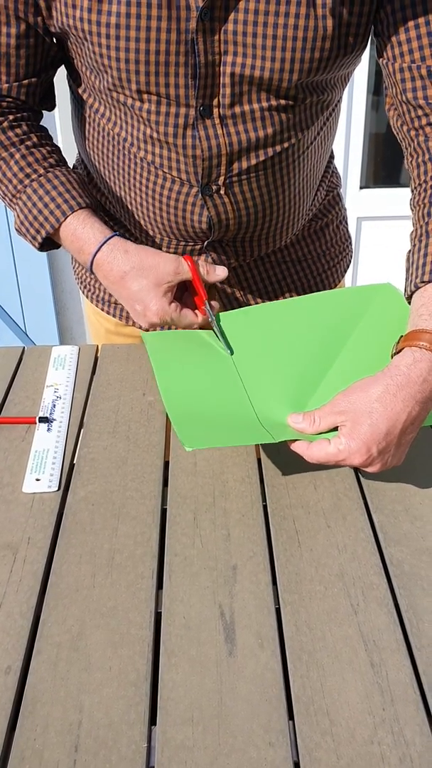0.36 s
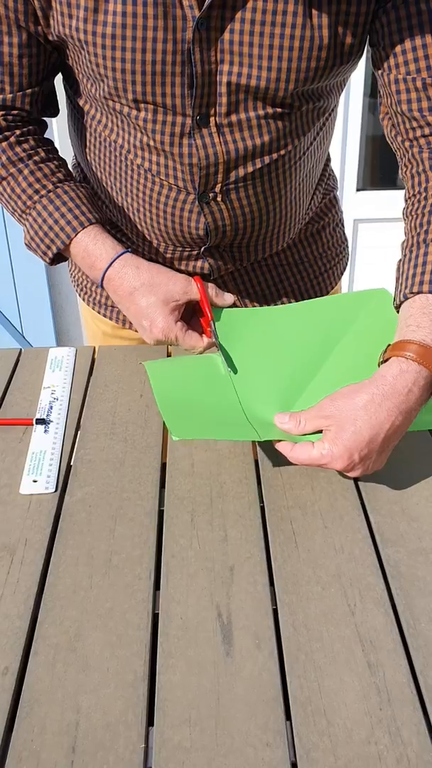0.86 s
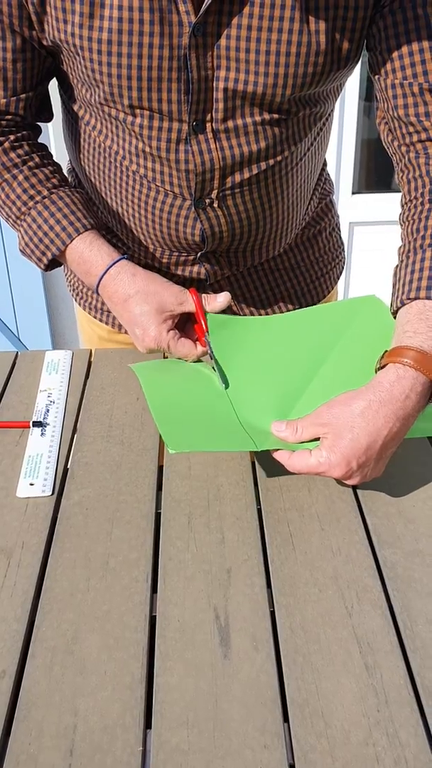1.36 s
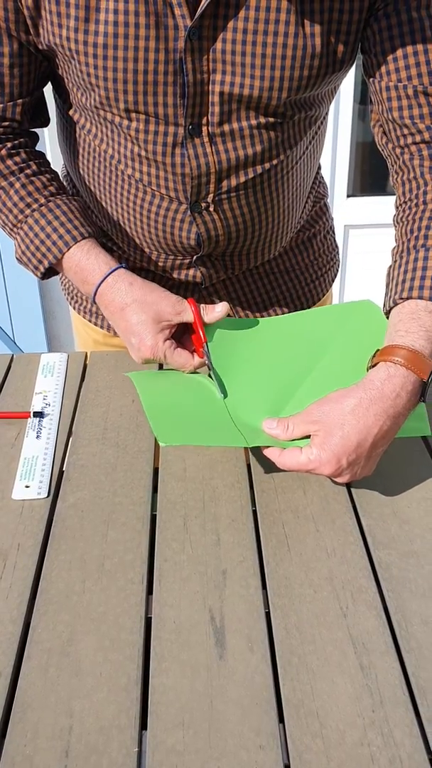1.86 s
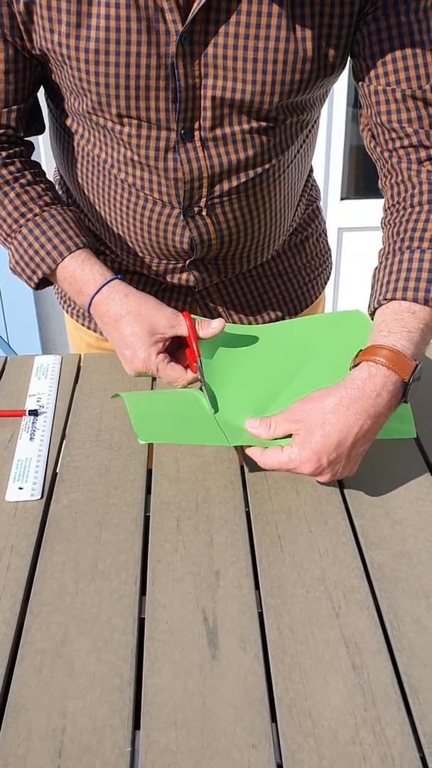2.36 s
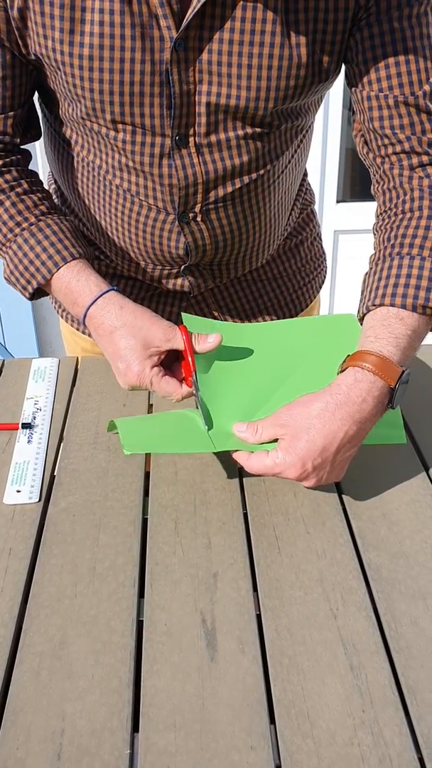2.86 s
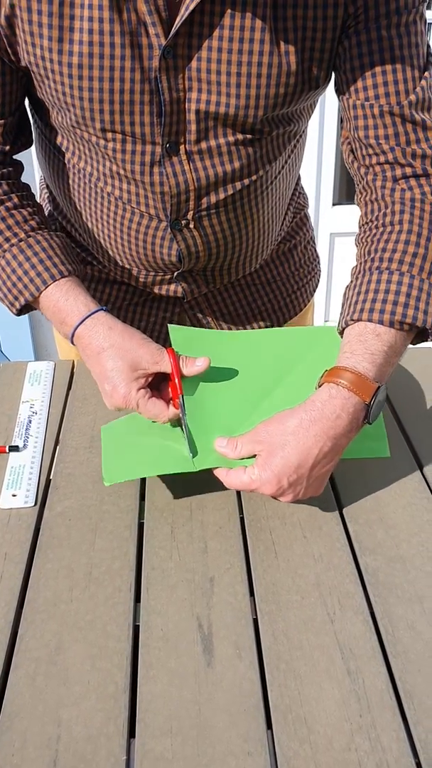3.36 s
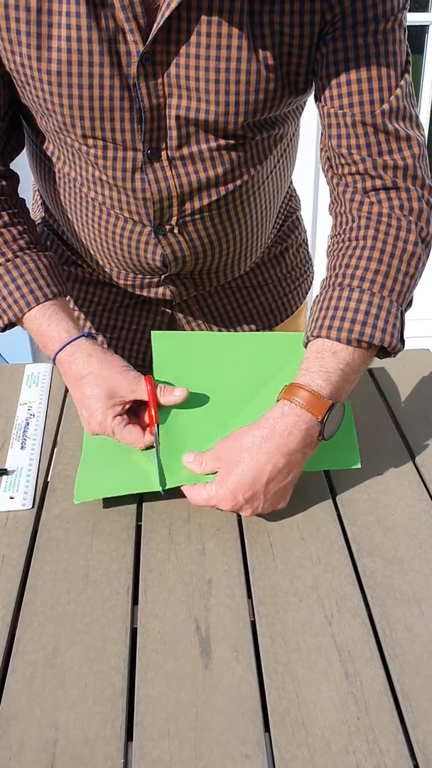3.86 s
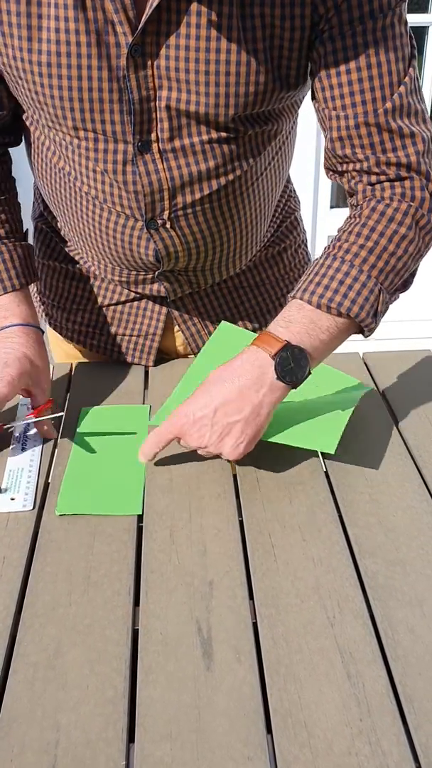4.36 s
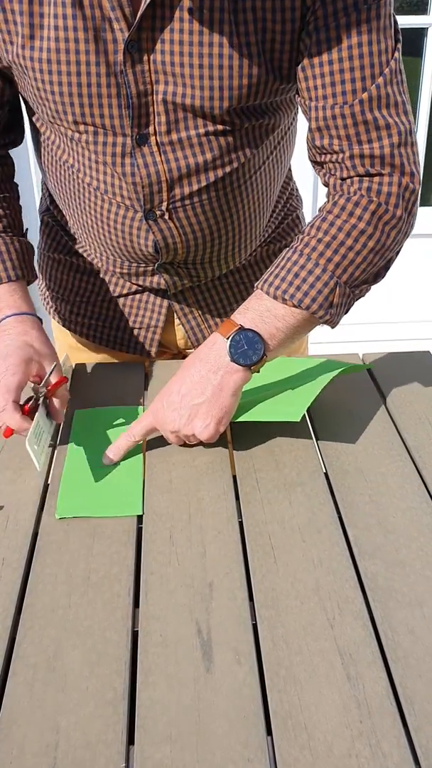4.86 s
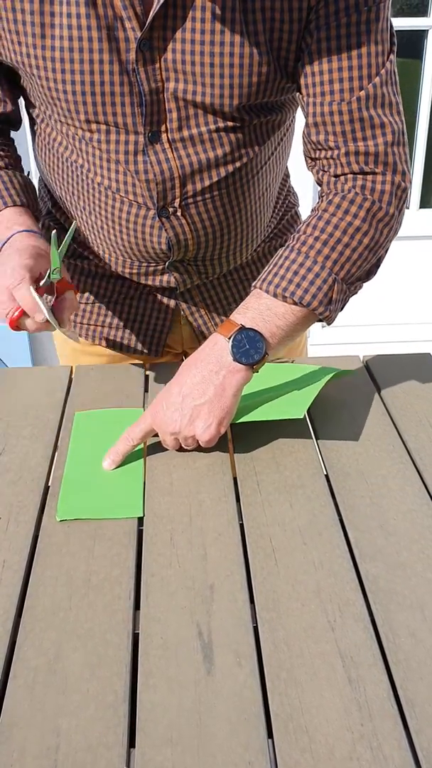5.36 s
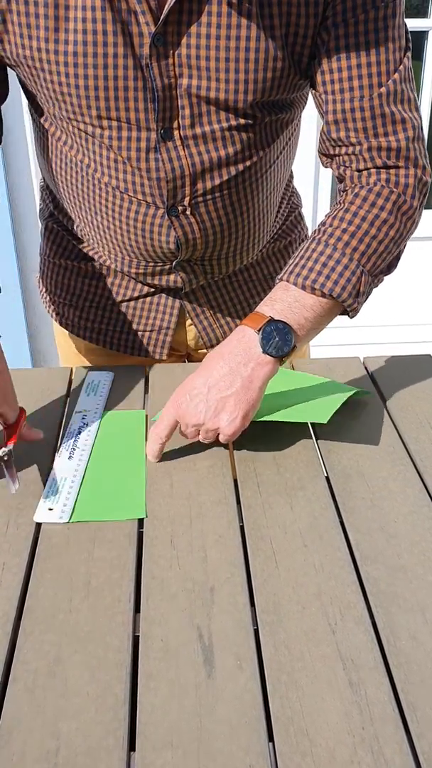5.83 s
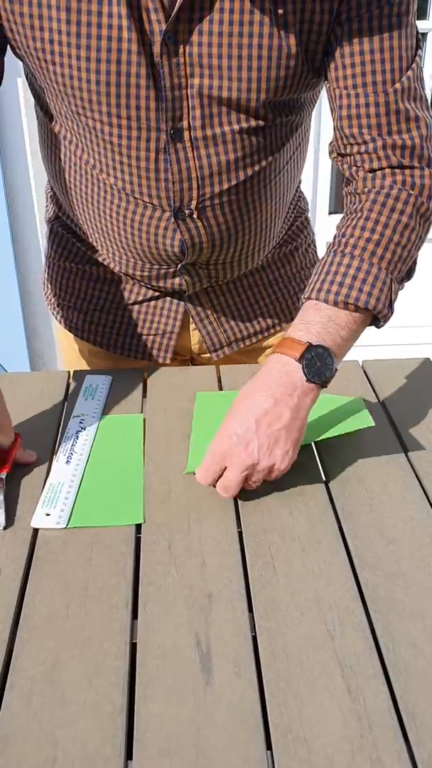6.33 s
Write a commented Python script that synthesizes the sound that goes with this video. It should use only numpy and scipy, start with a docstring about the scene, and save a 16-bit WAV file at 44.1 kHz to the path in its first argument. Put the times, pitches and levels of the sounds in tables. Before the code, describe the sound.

Close stereo sound of paper being snipped, with short crackling rips, papery rasping and a firm blade clap near the end of the cut. Then come hard clacks and slides of a ruler on wooden boards, a pause, a bright slap, light ticks and a rustling drag of the sheet. Dry outdoor space, quiet air hiss, irregular wind puffs thudding in the microphones.

```python
"""Scissors work through a sheet of paper over a wooden table outdoors, closing in jerks and sliding open again:
random fibre crackle is filtered into sheet, treble, body and edge layers, with short noise rips on top. Blades
clap, the ruler ticks in small bounces, pieces slide, a ruler is tipped up and slapped back, and the sheet is
dragged off: the blows are decaying noise, with ringing wood under the ruler; the slides are crackle filtered
for wood. Gusts thump in the two microphone ports as lumpy low noise, over a faint, drifting hiss of open air."""
import sys
import numpy as np
from scipy import signal
from scipy.fft import rfft, irfft, next_fast_len
from scipy.io import wavfile
from scipy.ndimage import uniform_filter1d

SR = 44100
rng = np.random.default_rng(int(sys.argv[2]) if len(sys.argv) > 2 else 0)


def to_wav(sig):
    """Store sig (one row per channel, or 1-D mono) as 16-bit WAV at the path in sys.argv[1].

    Samples outside -1..1 are clipped; the rate is SR.
    """
    pcm = np.clip(np.atleast_2d(sig), -1, 1) * 32767
    pcm = np.round(pcm).astype(np.int16)
    wavfile.write(sys.argv[1], SR, pcm.T)  # frames by channels


def voltage_ratio(decibels):
    """Convert decibels (scalar or array-like) to amplitude ratios, 20 dB per decade."""
    exponent = np.asarray(decibels, float) / 20
    return 10 ** exponent


N = 295890  # samples

# Spectra of what is rubbed, torn or struck. Each row: frequency in Hz, relative level in dB per Hz.
# Rubbed sheet
PAPER_SPECTRUM = [(700, -28), (1100, -5), (1600, 4.5), (2700, 2.5), (3900, -0.5), (5000, -7), (7000, -59)]
# Tearing fibres
FIBRE_SPECTRUM = [(3500, -8), (5000, 2), (7000, 4.5), (8200, -7), (10500, -5.5), (14500, -3.5),
                  (16200, -27), (16600, -60)]
# The whole sheet as a low body
BODY_SPECTRUM = [(300, -2.5), (550, 0), (800, 5.5), (1050, -4), (1400, -35.5)]
# Edges scraping on wood
SCRAPE_SPECTRUM = [(3500, -15), (4800, -6.5), (7100, -0.5), (8000, -21.5), (10000, -14.5), (14500, -12.5),
                   (16200, -41), (16600, -59)]
# Thudding table boards
THUD_SPECTRUM = [(180, -10), (350, 3.5), (550, -4.5), (850, 1), (1100, -9.5), (1400, -33)]


def evened(x):
    """Scales to rms 1."""
    return x / np.sqrt(np.mean(x ** 2) + 1e-20)


def read(points, hz):
    """Reads a table on a log-frequency axis."""
    f, value = np.transpose(points)
    return np.interp(np.log(hz + 1), np.log(f + 1), value)


def colour(x, points):
    """Filters by a spectrum table, to rms 1."""
    size = next_fast_len(x.shape[-1])
    gain = voltage_ratio(read(points, np.fft.rfftfreq(size, 1 / SR)))
    return evened(irfft(rfft(x, size) * gain, size)[..., :x.shape[-1]])


def add(mix, s, sound):
    """Mixes a sound in at time s."""
    part = mix[round(s * SR):][:len(sound)]
    part += sound[:len(part)]


def lumps(seconds, shape=N):
    """Slow random drift of rms 1: noise averaged twice over the given time."""
    size = max(int(seconds * SR), 2)
    return evened(uniform_filter1d(uniform_filter1d(rng.standard_normal(shape), size), size))


def fade(t, t60):
    """Exponential decay that falls 60 dB in t60 seconds."""
    return voltage_ratio(-60 * t / t60)


def band(x, hz, sharp):
    """A resonance of given sharpness (Q), to rms 1."""
    return evened(signal.lfilter(*signal.iirpeak(hz, sharp, SR), x))


def gliding(x, hz, width_hz):
    """A resonance that follows the curve hz, to rms 1: shifted down to 0 Hz, smoothed and shifted back."""
    turn = np.exp(2j * np.pi * np.cumsum(hz) / SR)
    r = np.exp(-np.pi * width_hz / SR)
    return evened((turn * signal.lfilter([1 - r], [1, -r], x / turn)).real)


def wind():
    """Lumpy low pressure swirls, mostly separate at each port; a gust can strike one side harder."""
    # Gusts in the ports. Each row: strongest moment in seconds, relative level in dB, seconds to build 20 dB,
    # seconds to die 20 dB (either time is at least 0.01 s), left over right in dB.
    gusts = [(.07, -34.5, 0.13, 0.15, -3), (0.151, -32, 0.06, -0.15, 0), (.22, -46, 3, 0.5, -16),
             (0.339, -37.5, -2.1, 0.05, -5), (0.428, -30, -0.07, .09, 3.5), (0.598, -32, 0.03, 0.16, -1.5),
             (.91, -36, 0.09, .12, -14), (1.029, -27.5, 0.07, 0.14, -8), (1.208, -35, .15, 0.33, -20),
             (1.7, -52.5, -0.8, 0.4, -9), (1.955, -39.5, -0.07, 0.03, -14), (2.028, -36.5, 0.02, 0.1, -5),
             (2.11, -40.5, -0.05, 0.02, -9), (2.18, -49.5, -0.17, 0.13, -18),
             (2.731, -40.5, -0.37, -0.34, 0), (3.38, -59, 2, 0.9, -8.5), (3.96, -57, -0.6, 11, -22),
             (4.059, -46, 0.1, -0.1, 1), (4.56, -48, 0.7, 0.4, -25), (4.69, -52.5, -3.15, 0.8, -10),
             (5.288, -40.5, -0.5, 0.4, -3.5), (5.488, -26, -0.1039, 0.05, -3), (5.74, -51.5, 0.8, 0.4, 0),
             (5.9, -49.5, 0.5, -0.15, -2), (6.181, -46.5, .1, 0.5, 0), (6.27, -48.5, -0.1, 0.4, 3.5),
             (6.432, -33, 0.03, -0.13, 2), (6.71, -50.5, -0.2, .1, -24)]
    # Spectrum of the rumble. Each row: frequency in Hz, relative level in dB per Hz.
    rumble = [(18, -48), (35, 0), (60, 6), (90, 3.5), (150, -6.5), (250, -15.5), (400, -24.5), (700, -50.5),
              (1200, -81)]
    t = np.arange(0, N / SR + .002, .001)
    power = voltage_ratio(-92) ** 2  # lull between gusts
    for s, db, build, die, left_db in gusts:
        share = voltage_ratio(left_db * np.array([[1], [-1]]))  # power at left and right
        sag_db = 20 * abs(t - s) / np.where(t < s, max(build, .01), max(die, .01))
        power = power + share / share.mean() * voltage_ratio(db - sag_db) ** 2
    gust_level = [np.interp(np.arange(N) / SR, t, p) for p in np.sqrt(power)]
    a, b = rng.standard_normal((2, N))
    swirl = np.array([colour(port, rumble) for port in (a, .1 * a + b)])
    swirl /= np.sqrt(uniform_filter1d(swirl ** 2, 3000)) + 1.4  # the gusts set the slow level
    lumpy = evened(swirl * voltage_ratio(3.46 * lumps(0.014, (2, N))))
    return lumpy * gust_level * voltage_ratio(3.0)


def air():
    """Distant hiss of the open air, drifting a little, more alike at the two ports in the lows."""
    # Likeness of the two ports. Each row: frequency in Hz, left-right likeness (1 = identical).
    likeness = [(150, 0.83), (500, 0.87), (2000, 0.1), (8000, 0.076)]
    # Spectrum of the hiss. Each row: frequency in Hz, relative level in dB per Hz.
    hiss_spectrum = [(70, -50), (120, -18.5), (270, -4.5), (430, -3.5), (700, -8), (1750, -13), (4000, -14),
                     (7000, -18), (8200, -32), (11400, -28), (15200, -35.5), (16500, -41)]
    size = next_fast_len(N)
    a, b = rfft(rng.standard_normal((2, size)))
    same = np.clip(read(likeness, np.fft.rfftfreq(size, 1 / SR)), -1, 1)
    pair = irfft([a, same * a + np.sqrt(1 - same ** 2) * b], size)[:, :N]
    drift_db = .8 * lumps(.1)
    return voltage_ratio(-59.08 + drift_db) * colour(pair, hiss_spectrum)


def crackle(per_s, spread_db, hiss):
    """Fibres snapping at random, a few of them large, over a smooth hiss."""
    size = voltage_ratio(spread_db * np.minimum(rng.exponential(1, N), 4.0)) * rng.choice([-1., 1.], N)
    snaps = evened(size * (rng.random(N) < per_s / SR))
    return evened(snaps + hiss * rng.standard_normal(N))


def effort(strokes, rise_db, fall_db, bow, body_db, body_share, edge_db, body_db_per_s=0, edge_db_per_s=0):
    """Gains of sheet, treble, low body and stiff edge: each stroke swells by rise_db and sags by fall_db.

    bow bends the swell; the body follows only body_share of it; body and edge levels drift with start time."""
    levels = np.zeros((4, N))
    for start, top, end, db, treble_db in strokes:
        t = np.arange(start, end, 1 / SR)
        away = np.interp(t, (start, top, end), (1, 0, 1))
        sag_db = np.where(t < top, rise_db, fall_db) * away ** bow
        ramps = signal.windows.tukey(len(t), min(0.0041 * SR / len(t), 1))
        body_over = body_db + body_db_per_s * start + (1 - body_share) * sag_db
        edge_over = edge_db + edge_db_per_s * start
        for layer, over in zip(levels, (0, treble_db, body_over, edge_over)):
            add(layer, start, ramps * voltage_ratio(db - sag_db + over))
    return levels


def rubbing(levels, drive, treble, body, sheet_hz, judder_db):
    """Crackle in the sheet's four ranges; the bending sheet shifts its pitch; the grip judders."""
    # Wide flap of the sheet. Each row: frequency in Hz, relative level in dB per Hz.
    wide = [(700, -35), (1200, 4.5), (1600, 4.5), (2200, 3), (2800, 1), (3300, -88), (4000, -37)]
    # Stiff paper at the cut. Each row: frequency in Hz, relative level in dB per Hz.
    narrow = [(2300, -23.5), (2900, 0.5), (3400, -1.5), (4100, 0.5), (4800, -11.5), (6000, -24)]
    sheet = colour(drive, wide)
    stiff = colour(drive, narrow)
    bending_hz = sheet_hz * np.exp(0.16 * lumps(0.032))
    sheet = evened(sheet + 1.33 * gliding(sheet + 0.5 * stiff, bending_hz, 450))
    layers = np.array([sheet, colour(drive, treble), colour(drive, body), stiff])
    return (levels * layers).sum(0) * voltage_ratio(judder_db * lumps(0.014))


def blades():
    """Blades close and slide open; as the uncut strip shortens, pitch climbs, edge sings out and body thins."""
    # Blades closing through the paper. Each row: start, hardest moment and end in seconds,
    # relative rub level in dB, fibre treble over it in dB.
    closings = [(.04, .052, .275, -56, -9), (.28, .33, .36, -55, -4), (.36, .44, 0.54, -61, -6.5),
                (.52, .57, 0.612, -52.5, -16), (.55, .7, 0.77, -56.5, -2), (.81, .842, .865, -55.5, -27),
                (.93, .946, .965, -52.5, -22), (1.1, 1.212, 1.3, -48, -10), (1.34, 1.415, 1.42, -58, -7),
                (1.65, 1.72, 1.737, -54.5, -8), (1.75, 1.76, 1.82, -51, -14),
                (2.01, 2.052, 2.15, -49, -5.5), (2.37, 2.455, 2.485, -45.5, -9.5),
                (2.68, 2.737, 2.77, -45.5, -4.5), (2.978, 3.03, 3.047, -40, -7),
                (3.225, 3.23, 3.26, -49, -18), (3.262, 3.27, 3.325, -44, -8),
                (3.775, 3.789, 3.855, -46, -11), (3.855, 3.86, 3.9, -42.5, -13),
                (3.918, 3.922, 3.945, -52, -10)]
    # Blades sliding open along the cut. Each row: start, hardest moment and end in seconds,
    # relative rub level in dB, fibre treble over it in dB.
    openings = [(1.415, 1.5, 1.6, -51, -8), (1.845, 1.907, 2.0, -50.5, -7), (2.185, 2.265, 2.345, -48, -7),
                (2.53, 2.61, 2.66, -48.5, -5), (2.82, 2.876, 2.96, -50, -6.5),
                (3.115, 3.19, 3.225, -50.5, -4.5), (3.4, 3.445, 3.51, -49.5, -7.5),
                (3.515, 3.65, 3.72, -60, -5), (3.94, 3.95, 4.05, -62.5, 1.5)]
    levels = effort(closings, rise_db=7.5, fall_db=7.5, bow=0.99, body_db=-8, body_share=0.38,
                    edge_db=-20.5, body_db_per_s=-2, edge_db_per_s=4)
    levels += effort(openings, rise_db=8.5, fall_db=10, bow=1.46, body_db=-6.5, body_share=.3,
                     edge_db=-20.5, body_db_per_s=-1.5, edge_db_per_s=4)
    strip_hz = 1705 * 2 ** (0.11 * np.arange(N) / SR)  # climbs 0.11 octaves per second
    fibres = crackle(per_s=3000, spread_db=3.6, hiss=0.88)
    return rubbing(levels, fibres, FIBRE_SPECTRUM, BODY_SPECTRUM, strip_hz, judder_db=1.36)


def jerks():
    """The blades catch on a few fibres: a short rip swells and dies, pitched by the free length of paper."""
    # Rips. Each row: time in seconds, relative level in dB, paper pitch in Hz, treble over it in dB,
    # low body over it in dB.
    rips = [(0.1144, -38, 2050, -20, -9), (0.1434, -34.5, 1640, -5.5, -4.5), (0.335, -36.5, 2170, -12, -37),
            (0.5247, -34.5, 1830, -12, -7), (0.7304, -38.5, 1190, -20, 5), (1.1653, -31, 2040, -5, -9),
            (1.2394, -34.5, 1610, -5, 5), (1.2665, -31.5, 2000, -2.5, -4), (1.4259, -27, 1390, -9, -40),
            (1.4451, -23, 2000, -30.5, -6), (1.5433, -25.5, 1520, -13, 2.5), (1.694, -36.5, 2180, -4, 0),
            (1.7217, -30.5, 1900, -7, -12), (1.7532, -25, 2130, -6, -7), (1.7747, -30.5, 2560, -13.5, -25),
            (2.0512, -31, 1700, -28, -17), (2.0788, -30, 1570, -9, -23), (2.1181, -23.5, 1630, -10, -30),
            (2.3732, -34.5, 1990, -12, -25), (2.3998, -32, 1910, -2, -19.5), (2.4294, -31.5, 1850, -12, -8),
            (2.4496, -25, 1680, -2.5, -36), (2.7354, -30.5, 2420, 0.5, -20.5), (2.7624, -35.5, 2620, -7, 0),
            (2.9876, -34.5, 2110, -7.5, -15), (3.026, -34, 1750, -11, -18),
            (3.0599, -25, 1780, -7.5, -12.5), (3.2686, -27, 1630, -14, -22), (3.2918, -25, 2760, -9.5, -43),
            (3.3132, -29.5, 1730, -15, -30), (3.3513, -26.5, 1900, -9, -34), (3.8611, -32.5, 2650, -1, -14),
            (3.9115, -24.5, 1700, 0.5, -25), (3.9294, -35, 1160, -1, -32)]
    swell_s, rip_t60_s = .004, 0.034
    out, t = np.zeros(N), np.arange(4000) / SR
    for s, db, hz, treble_db, body_db in rips:
        noise = rng.standard_normal(len(t))
        rip = 0.93 * band(noise, hz, 5.1) + 0.41 * colour(noise, PAPER_SPECTRUM)
        rip += voltage_ratio(treble_db) * colour(noise, FIBRE_SPECTRUM)
        rip += voltage_ratio(body_db) * colour(noise, BODY_SPECTRUM)
        swell = np.sin(np.pi / 2 * np.minimum(t / swell_s, 1))
        add(out, s, voltage_ratio(db - 11.5) * rip * swell * fade(np.maximum(t - swell_s, 0), rip_t60_s))
    return out


def struck(blows, t60, modes):
    """A crack, a noisy rattle that dies faster in the treble, and the modes of what is struck."""
    # A flat hard slap. Each row: frequency in Hz, relative level in dB per Hz.
    snap = [(6000, -12), (8000, 2), (11000, -4), (15500, -14), (16600, -43)]
    out, t = np.zeros(N), np.arange(8000) / SR
    for s, db, hz, treble_db, thud_db in blows:
        noise = rng.standard_normal(len(t))
        pitched = 0.78 * band(noise, hz, 40.0) + 0.48 * colour(noise, PAPER_SPECTRUM)
        rattle = (fade(t, t60) + 1.11 * fade(t, 0.011)) * pitched
        # bright blows reach the top
        bright = colour(noise, SCRAPE_SPECTRUM) + voltage_ratio(1.4 * treble_db - 19.5) * colour(noise, snap)
        rattle += voltage_ratio(treble_db) * (fade(t, 0.59 * t60) + 1.67 * fade(t, 0.022)) * bright
        rattle += voltage_ratio(thud_db) * fade(t, 2.0 * t60) * colour(noise, THUD_SPECTRUM)
        ring = sum(voltage_ratio(m_db) * fade(t, d) * np.sin(2 * np.pi * f * t) for f, m_db, d in modes)
        attack = np.minimum(t / 0.00068, 1)
        add(out, s, voltage_ratio(db - 11.5) * (rattle + voltage_ratio(0.5 * thud_db - 9.5) * ring) * attack)
    return out


def claps():
    """The blades clap together: decaying noise around a pitch, without ringing modes."""
    # Claps. Each row: time in seconds, relative level in dB, pitch in Hz, treble over it in dB,
    # thud over it in dB.
    blows = [(3.2211, -17.5, 1570, -41.5, -11.5), (3.9147, -23.5, 2710, 4, -30.5)]
    return struck(blows, t60=0.041, modes=[])


def ticks():
    """Thin ticks, mostly bright, as the ruler makes small bounces: very short noise without ringing modes."""
    # Ticks. Each row: time in seconds, relative level in dB, pitch in Hz, treble over it in dB,
    # thud over it in dB.
    blows = [(4.1094, -59.5, 1070, 11.5, -7), (5.706, -25.5, 1930, 10.5, -15), (5.742, -56, 1110, 10, -8),
             (5.7488, -48, 1110, 9, -5), (5.7844, -53, 1720, 10, -12), (5.8155, -50.5, 1140, 10.5, -7),
             (5.997, -30.5, 2400, 0, -26)]
    return struck(blows, t60=0.02, modes=[])


def sliding():
    """Paper or ruler moves over the boards, then the sheet is dragged off in surges: crackle scraped on wood."""
    # Paper or ruler moving, and faint swells of bright hiss near 5.1 s and 5.95 s. Each row: start,
    # hardest moment and end in seconds, relative rub level in dB, scrape treble over it in dB.
    moves = [(4.4, 4.49, 4.65, -56, 3), (4.5, 4.65, 4.68, -48, -1), (4.665, 4.67, 4.73, -36, -26),
             (4.69, 4.74, 4.8, -36, -23), (4.775, 4.78, 4.95, -38.5, -2), (4.9, 5.11, 5.3, -80, 12),
             (5.25, 5.296, 5.38, -62, 8.5), (5.43, 5.487, 5.56, -65.5, 8), (5.48, 5.564, 5.6, -56.5, -10),
             (5.85, 5.947, 6.0, -80, 11), (5.622, 5.626, 5.67, -43.5, -18), (5.625, 5.64, 5.8, -39, 6),
             (5.65, 5.715, 5.87, -47, -6.5), (5.986, 5.992, 6.4, -53.5, -10.5),
             (6.25, 6.256, 6.55, -57.5, -7)]
    # Surges of the sheet dragged off. Each row: start, hardest moment and end in seconds,
    # relative rub level in dB, scrape treble over it in dB.
    drags = [(6.415, 6.48, 6.56, -43.5, -1), (6.5, 6.575, 6.62, -40, -2), (6.59, 6.63, 6.69, -37.5, -5.5)]
    levels = effort(moves, rise_db=16, fall_db=32.5, bow=1.03, body_db=-3, body_share=0.52,
                    edge_db=-6.5, edge_db_per_s=0.2)
    levels += effort(drags, rise_db=15, fall_db=25.5, bow=2.43, body_db=-10, body_share=0.85, edge_db=-4)
    grains = crackle(per_s=2500, spread_db=1.5, hiss=0.52)
    return rubbing(levels, grains, SCRAPE_SPECTRUM, THUD_SPECTRUM, sheet_hz=2130, judder_db=2.5)


def knocks():
    """Ruler, fingers and paper edges strike the table: rattling noise over the ringing modes of the wood."""
    # Strikes. Each row: time in seconds, relative level in dB, pitch in Hz, treble over it in dB,
    # thud over it in dB.
    blows = [(4.5026, -28, 2850, -29, -7), (4.5386, -36, 1510, -33, -3), (4.6613, -13, 2210, -12.5, -36),
             (4.718, -29, 1120, -31, 3.5), (4.7283, -22, 1950, -20, -1), (4.7442, -13, 2280, -8, -8),
             (4.7646, -9.5, 1124, -2.5, -22), (4.7849, -20, 1210, -0.5, -23), (5.5955, -22.5, 2200, 6, -8),
             (5.6147, -17, 2630, 10, -38), (5.632, -18, 1960, -19, -27), (5.678, -29, 4800, 9.5, -10),
             (5.8344, -45, 3900, 0, -15), (5.984, -28, 1217, -33, -33), (6.0653, -27.5, 1960, -16.5, -7),
             (6.2481, -32, 3880, -5, 2.5), (6.6928, -23.5, 1230, -41, 0.5)]
    # Modes of ruler on wood. Each row: frequency in Hz, relative level in dB, 60 dB decay time in seconds.
    board = [(338, -7, 0.29), (384, 2, 0.28), (517, 1, 0.1), (813, 11, 0.033), (1120, -4, 0.16),
             (2230, -10, 0.065), (5400, -9, 0.028), (7040, -18, 0.013)]
    return struck(blows, t60=0.086, modes=board)


def ports(x, left_db, echo_db, t60):
    """The ports hear the source with a phase step and short decaying echoes, both redrawn at random."""
    # Phase between the ports. Each row: frequency in Hz, left's lead in radians before its random scaling.
    phase_lead = [(0, -5.5), (300, 1.34), (1200, -0.77), (2800, 0.5), (5000, 2.5), (7000, 10.5),
                  (10000, 14.5), (16500, 15.5)]
    t, hop = np.arange(8000) / SR, int(.15 * SR)  # redrawn every 0.15 s
    size = next_fast_len(2 * hop + len(t))
    x, out = np.pad(x, (hop, 2 * hop)), np.zeros((2, N + 3 * hop + size))
    lead = np.interp(np.fft.rfftfreq(size, 1 / SR), *np.transpose(phase_lead))
    for at in range(0, N + hop, hop):
        part = rfft(x[at:at + 2 * hop] * np.hanning(2 * hop), size)  # overlapping, cross-faded
        echoes = rng.standard_normal((2, len(t))) * fade(t, t60) * (t > .0008)
        echoes *= voltage_ratio(echo_db) / np.linalg.norm(echoes, axis=1, keepdims=True)
        left = np.exp(1j * rng.uniform(0.7, 1.254) * lead) * voltage_ratio(left_db / 2)
        right = voltage_ratio(-left_db / 2) + 0 * lead
        out[:, at:at + size] += irfft(part * (np.array([left, right]) + rfft(echoes, size)), size)
    return 0.73 * out[:, hop:hop + N]


def scene():
    """Scissors above the table, handling on it, wind and air."""
    scissors = ports(blades() + jerks(), left_db=-4.0, echo_db=0.93, t60=0.035)
    handling = claps() + ticks() + sliding() + knocks()
    table = ports(handling, left_db=-2.9, echo_db=-0.3, t60=0.062)
    return scissors + table + wind() + air()


def band_limit(x):
    """A steep low-pass at the top of the band."""
    return signal.sosfilt(signal.butter(12, 16640, fs=SR, output="sos"), x)


def record(dry):
    """Delivers the finished mix."""
    return band_limit(dry)


dry = scene()
out = record(dry)
to_wav(out)
```